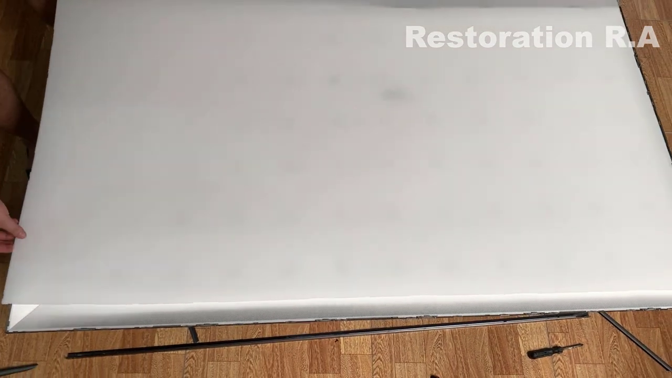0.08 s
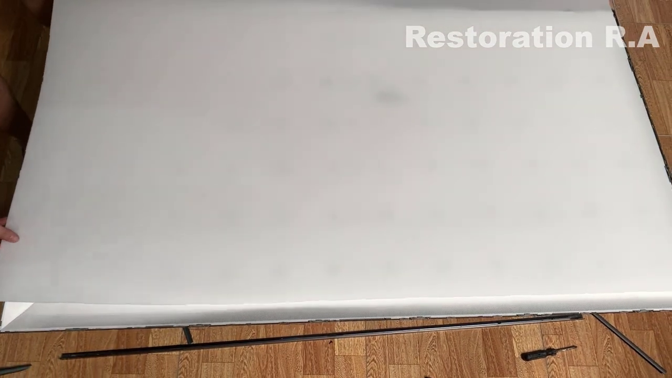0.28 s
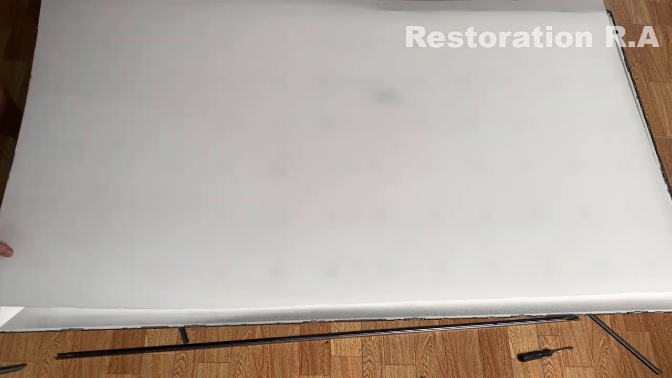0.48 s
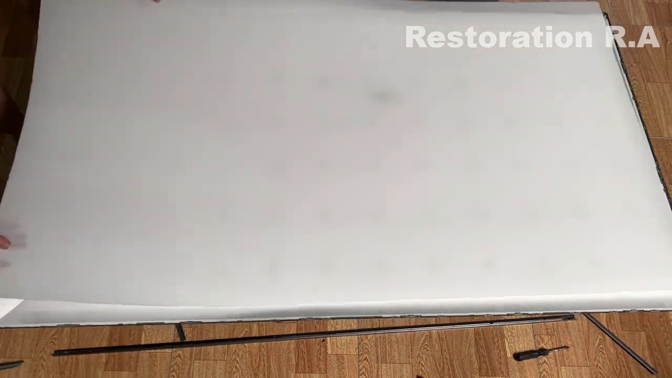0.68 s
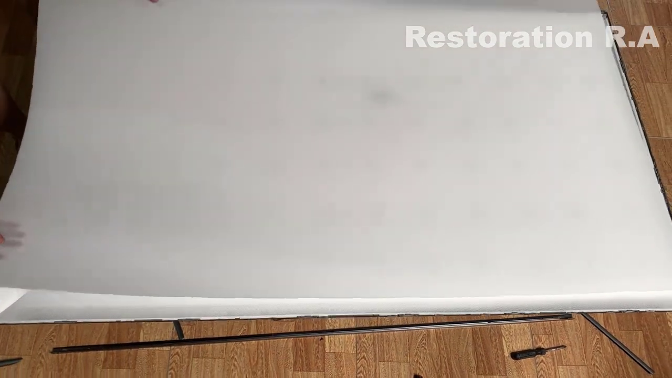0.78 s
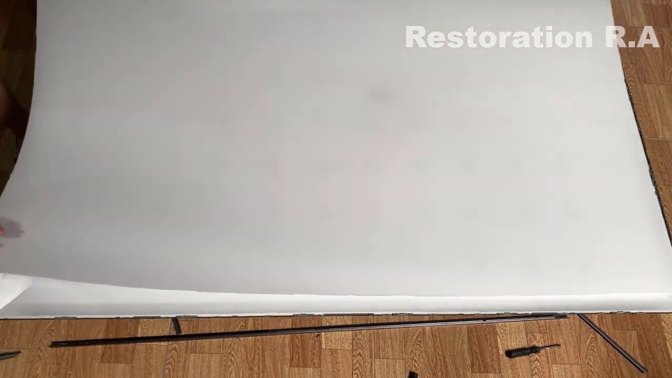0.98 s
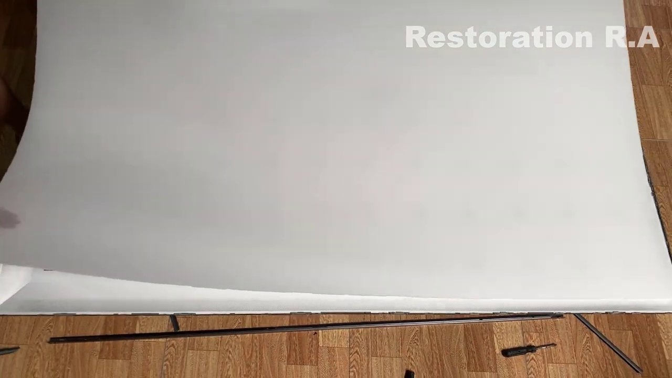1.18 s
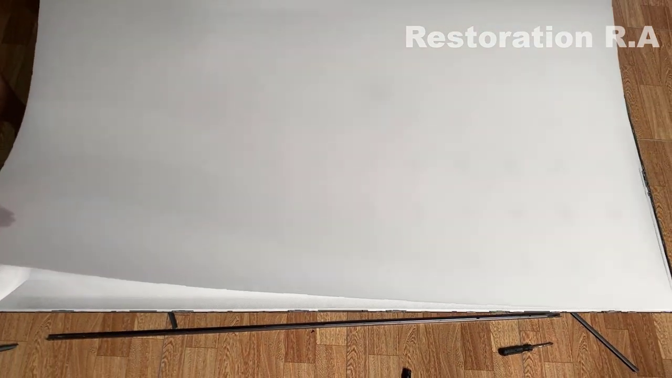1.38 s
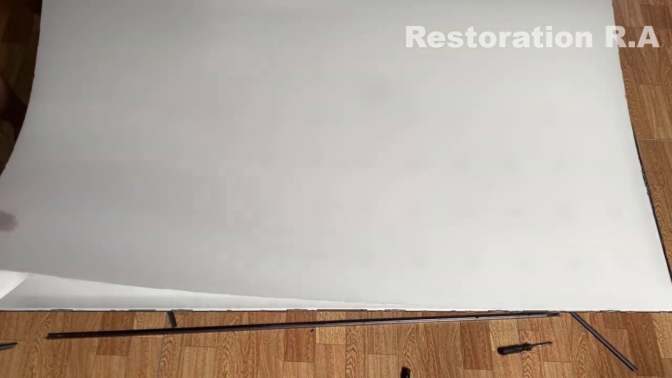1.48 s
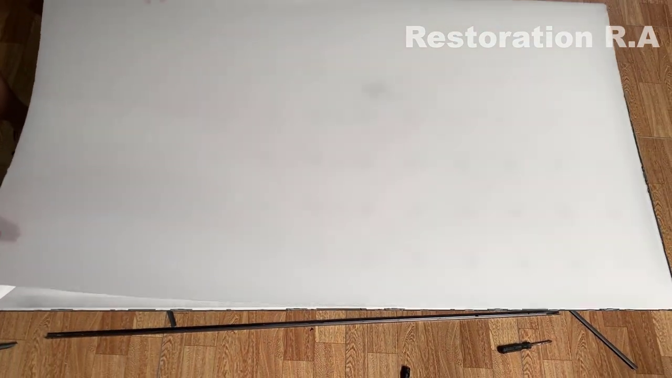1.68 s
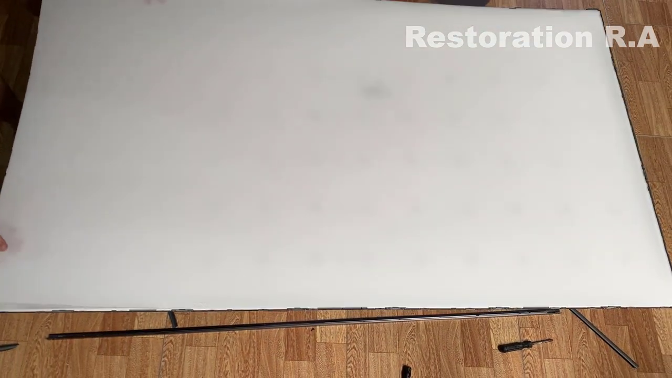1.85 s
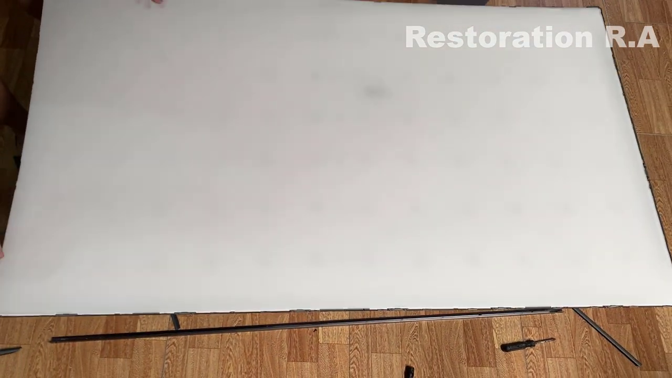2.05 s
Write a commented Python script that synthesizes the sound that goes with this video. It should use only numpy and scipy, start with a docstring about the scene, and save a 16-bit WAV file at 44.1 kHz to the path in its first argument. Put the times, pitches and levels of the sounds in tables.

```python
"""Large plastic sheet, buckling and sliding

A large thin plastic sheet is lifted by one edge and let down again in a small workshop, in stereo.
Buckles are filtered impulses with a ringing pop; bending is random crackle, crinkles and dull wobbles.
Slides are dense stick-slip ticks shaped into rasp, scrape and hiss; groans are gliding rough tones.
Soft flaps are swells of low noise, with one low whump. Decaying noise makes the short room reverb.
A quiet noise floor lies beneath."""
import sys
import numpy as np
from scipy import signal
from scipy.fft import rfft, irfft
from scipy.io import wavfile
from scipy.ndimage import uniform_filter1d, map_coordinates

SR = 44100
rng = np.random.default_rng(int(sys.argv[2]) if len(sys.argv) > 2 else 0)


def transcribe(signal):
    """Save signal, clipped to [-1, 1], as a 16-bit WAV file at the path in sys.argv[1]."""
    frames = np.atleast_2d(signal).T
    limited = np.clip(frames, -1, 1)
    pcm = np.round(limited * 32767).astype(np.int16)
    wavfile.write(sys.argv[1], SR, pcm)


N = 92610
TIME = np.arange(N) / SR  # s

# All event levels are relative, ahead of the layer gains and the room mix.
# Rise and fall are 1/e times either side of the peak at t, except in slides,
# which start at t and ramp up over the rise. Colours only set a spectral shape.

# Sharp buckles: t/s, body level/dB, tick level/dB, crack level/dB, f of the snapping patch/Hz
BUCKLES = [(.201, -11, -3, -39, 1290), (.2335, -52, -7.5, -24, 1300), (0.2533, -6.5, -4.5, -16, 1410),
           (0.2579, -9, -7.5, -14, 1270), (.265, -3.5, -1.5, -26, 1330), (0.393, -9, -9, -44, 637),
           (.425, -14, -6, -28.5, 910), (.462, -17, -7, -15, 660), (.482, -8.5, 0, -26, 620),
           (0.512, -28, -9, -35, 503), (.598, -11, -8.5, -40, 1323), (0.6623, -8.5, -14, -42.5, 823),
           (.778, -18, -24, -47, 537), (.806, -4, -6.5, -25, 890), (.849, -20, -20, -31, 834),
           (.891, -13, 0, -38, 526), (1.047, -40, -19, -37, 900), (1.126, -26.5, -12, -6.5, 990),
           (1.177, -16, -5, -37, 700), (1.194, -6, -13, -34, 746), (1.224, -4.5, -11, -25.5, 750),
           (1.243, -5, -3, -29, 1226), (1.276, -11, -13.5, -25, 617), (1.338, -6.5, -12, -24.5, 613),
           (1.360, -5, -22, -16.5, 620), (1.373, -1, -15, -7, 747), (1.389, -2.5, -30, -25, 613),
           (1.438, -7, -20.5, -24, 787), (1.461, -6.5, -15, -21, 826), (1.8035, -8, -48, -53, 680),
           (1.848, -31, -49.5, -58, 774)]
BUCKLE_DB, TICK_DB, PATCH_DB = 9, -8.5, -6  # gain of all buckles; tick trim; patch against body
PATCH_T60_S, CONTACT_RATIO = 0.046, 2.14  # contact low-pass as a multiple of the patch pitch
# Colour of the hollow pop and the fine crackle: f/Hz, level/dB
BODY_COLOUR = [(60, -46.5), (200, -23), (350, -9), (480, -6), (620, -1), (820, 2.5), (1000, -9), (1250, 0),
               (1500, -6), (1800, -7), (2500, -18.5), (3100, -31), (3900, -14), (5500, -41.5), (16000, -16)]
# Colour of the ringing tick: f/Hz, level/dB
TICK_COLOUR = [(300, -15.5), (900, -13.5), (2500, -11), (3100, -14.5), (3900, 10), (4300, 10.5),
               (5000, -17), (8000, -32), (9700, -9.5), (10900, 12), (12300, -8), (14200, -12), (15300, 9),
               (17000, -11)]
# Colour of the dry crack: f/Hz, level/dB
CRACK_COLOUR = [(200, -18), (900, 14.5), (2000, 6), (2800, 11.5), (3500, -8), (4600, 0.5), (6000, -2.5),
                (8000, -7), (11000, 1.5), (15500, -5), (17000, -20)]
# Ringing modes of the sheet: f/Hz, level/dB (ahead of MODE_DB)
SHEET_MODES = [(446, 2), (520, -3), (563, -6), (626, 0.5), (691, -2.5), (796, -8.5), (978, 3.5),
               (1209, -14), (1321, -11.5), (1809, -14)]
MODE_T60_S, MODE_DB = 0.24, -49.5

# Bending effort, the level of crackle and crinkles: t/s, level/dB
BENDING_EFFORT = [(0, -67), (.19, -62.5), (.215, -27), (.245, -45), (.265, -21), (.30, -45), (.385, -39),
                  (.405, -26), (.48, -23), (.52, -39.5), (.59, -34.5), (.65, -37), (.68, -28), (.74, -32),
                  (.78, -47), (.82, -23), (.86, -38), (.91, -31.5), (.98, -64), (1.11, -48), (1.14, -36),
                  (1.21, -46.5), (1.24, -32.5), (1.31, -28.5), (1.385, -22.5), (1.45, -25.5), (1.51, -30),
                  (1.62, -32.5), (1.68, -38), (1.74, -57.5), (1.81, -44), (1.86, -55), (1.88, -86),
                  (2.1, -88)]
CRACKLES_PER_S, CRACKLE_SPREAD_DB, FINE_CRACKLE_DB = 700, 4, -2
BEND_PER_S, BEND_SHIFT_S = 9, 0.003
CRINKLES_PER_S, CRINKLE_SPREAD_DB, CRINKLE_DB = 110, 2.5, -6
CRINKLE_HZ, CRINKLE_SPREAD_OCTAVES, CRINKLE_T60_S, CRINKLE_LOWEST_HZ = 978, 0.519, 0.014, 373
# Slow flexes of the whole sheet: t/s, rise/s, fall/s, level/dB
WOBBLES = [(1.862, 0.034, 0.034, -38), (1.908, 0.0088, 0.0067, -47.5), (2.066, 0.02, 0.012, -35.5)]
# Colour of the wobbles: f/Hz, level/dB
WOBBLE_COLOUR = [(100, -24), (350, -6), (480, 1), (600, 4.5), (900, -2.5), (1400, -25.5), (2200, -38),
                 (5000, -78)]

# Groans of the flexing sheet: t/s, rise/s, fall/s, f at the peak/Hz, glide/(octaves per s), level/dB
GROANS = [(.428, 0.0086, 0.012, 904, -7.5, -29), (.475, 0.018, 0.022, 660, 0, -29),
          (.50, 0.0096, .014, 530, -1, -28), (.543, 0.026, 0.025, 529.4, -1, -31),
          (.672, .005, 0.023, 305, 1.5, -40), (.735, .025, .025, 275, 1.5, -51),
          (.825, 0.007, 0.013, 581, 0, -26.5), (.905, 0.0068, 0.037, 545, -2.25, -34),
          (.968, 0.0047, 0.0075, 519, -3, -41.5), (1.07, .008, .008, 755, 3.5, -38.5),
          (1.245, 0.011, 0.0085, 318.8, -1.5, -32.5), (1.385, 0.01, 0.015, 357, -3, -29),
          (1.555, .012, 0.019, 370, 0, -33.5)]
GROAN_ROUGH, GROAN_ROUGH_PER_S = 0.45, 110

# Slides of sheet on sheet: start t/s, rise/s, length from t/s, squeaky rasp level/dB,
# coarse scrape level/dB, hiss level/dB, lower edge f of the hiss/Hz
SLIDES = [(0.137, 0.084, 0.105, -60, -53, -51.5, 6900), (0.236, 0.004, 0.012, -35.5, -35, -33, 9000),
          (0.25, 0.011, 0.028, -30, -38, -43, 8100), (0.389, 0.002, 0.071, -32, -39.5, -28.5, 4200),
          (0.469, 0.0043, 0.049, -34.5, -38.5, -36, 9900), (0.615, .003, 0.014, -31, -34, -27, 9100),
          (0.66, 0.0064, 0.023, -37.5, -36, -37, 9750), (0.785, .004, 0.018, -36, -41, -27.5, 9500),
          (0.801, .002, 0.08, -32.5, -35.5, -34.5, 9400), (0.888, .004, 0.024, -39, -29.5, -26, 9300),
          (1.042, 0.00064, 0.032, -41, -70, -42, 10200), (1.147, 0.0071, 0.092, -54, -34, -40.5, 9500),
          (1.218, 0.095, 0.13, -27, -31, -23.5, 8760), (1.356, 0.0031, 0.16, -33.5, -31.5, -30, 8150),
          (1.507, 0.054, 0.13, -51, -30.5, -25.5, 10400), (1.647, 0.0059, 0.042, -37, -50, -33, 10800),
          (1.799, 0.001, 0.0066, -49, -72, -24.5, 13800), (1.899, 0.0034, 0.011, -68, -77, -50.5, 9500)]
SLIPS_PER_S, SLIP_SPREAD_DB, SLIDE_RELEASE_S = 6000, 2.5, 0.0041
CATCHES_PER_S, CATCH_SPREAD_DB = 3200, 5
START_PUSH_DB, START_PUSH_S = 0.5, 0.0071
JUDDER_PER_S, JUDDER_DB = 130, 2.8
SQUEAK_PER_S, SQUEAK_DB = 60, 1
FLEX_PER_S, FLEX_SHIFT_S, HISS_SHIFT_S = 30, 0.000669, 0.001
# Edges of the sheet dragging grittily: t/s, rise/s, fall/s, level/dB
DRAGS = [(.43, 0.028, 0.014, -33.5), (.89, .004, 0.0073, -49), (1.226, .002, 0.014, -31),
         (1.345, 0.095, 0.028, -36.5), (1.485, 0.014, 0.015, -33), (1.59, 0.061, .03, -37.5)]
# Colour of the squeaky rasp: f/Hz, level/dB
RASP_COLOUR = [(300, -85), (2400, -26.5), (3100, -25.5), (3400, -14), (3600, 6.5), (3790, 6), (3970, -1),
               (4200, -13.5), (4700, -22.5), (5700, -38), (6700, -44), (16000, -45)]
# Colour of the coarse scrape: f/Hz, level/dB
SCRAPE_COLOUR = [(80, -44), (300, -15), (1200, -1.5), (2400, 2), (3050, -5.5), (3600, 5.5), (4400, 0),
                 (5300, -12), (6700, -45), (9000, -27.5), (16000, -29)]
# Colour of the gritty drags: f/Hz, level/dB
GRIT_COLOUR = [(300, -52), (3000, -33.5), (4400, 11.5), (5000, 3.5), (5700, 1), (6800, -21.5), (8500, -2),
               (10000, -10), (13000, -38)]
# Colour of the hiss: f/Hz, level/dB
HISS_COLOUR = [(1000, -21), (4500, -8), (5700, -5), (6700, -6), (8600, -13), (9800, -0.5), (10500, 6.5),
               (11000, 4.5), (11800, -8.5), (13400, -2), (14400, -6.5), (15400, -1), (16500, -24.5)]

# Soft flaps: t/s, rise/s, fall/s, air push level/dB, drumming level/dB
FLAPS = [(.26, 0.0074, 0.055, -48.5, -66), (.48, 0.031, 0.058, -59, -42.5),
         (0.666, 0.0073, 0.038, -46, -28.5), (.73, 0.046, 0.05, -48.5, -34.5),
         (1.235, 0.022, 0.017, -66, -42), (1.386, 0.0077, 0.0099, -38.5, -28.5),
         (1.44, 0.018, 0.064, -62, -43), (1.54, 0.063, 0.03, -65.5, -44.5)]
# Colour of the pushed air: f/Hz, level/dB
PUSH_COLOUR = [(20, -34), (45, -9), (68, -1.5), (100, -6.5), (160, -21), (500, -61)]
# Colour of the drumming sheet: f/Hz, level/dB
DRUM_COLOUR = [(50, -43), (110, -5), (170, 2.5), (230, -1.5), (300, 2), (380, 3), (600, 4.5), (2000, -71.5)]
# The sagging sheet drops on its cushion of air: t/s, rise/s, fall/s, f/Hz, level/dB
WHUMP = (1.385, .024, .024, 69, -34)

# Place of the pops, bending, groans and flaps: delay to the left microphone/s,
# early reflection level/dB, room level/dB (both against the direct sound)
BODY_PLACE = (.00002, -0.59, 0)
# Place of the rasp, scrape and drags: same columns
RASP_PLACE = (0.00017, 0.82, 0.54)
# Place of the hiss: same columns
HISS_PLACE = (0.0002414, -18, -0.62)
# Reverb time of the room: f/Hz, T60/s
ROOM_T60 = [(100, 0.72), (600, 0.36), (1500, 0.27), (4000, 0.23), (11000, 0.255), (16000, 0.24)]
EARLY_T60_S, ROOM_GAP_S = 0.035, 0.0056
LIKENESS_HZ, BASS_LIKENESS = 890, 0.92  # left-right correlation: corner, and value in the deep bass
# Colour of the background: f/Hz, level/dB
FLOOR_COLOUR = [(20, -23.5), (65, -1), (130, -2.5), (300, -8.5), (600, 0), (1200, -23), (3000, -23),
                (8000, -29), (16000, -43.5)]
FLOOR_DB, LEFT_DB, TOP_HZ = -58.5, -0.95, 15550


def buckles():
    """A patch of the sheet snaps through: a hollow pop at its own pitch, a ringing tick and a dry crack."""
    body, patch, tick, crack = np.zeros((4, N))
    t = TIME[:SR // 10]
    for at, body_db, tick_db, crack_db, hz in BUCKLES:
        i = int(at * SR)
        span = slice(i, i + len(t))
        contact = signal.butter(3, min(CONTACT_RATIO * hz, .4 * SR), fs=SR, output="sos")
        tone = np.cos(2 * np.pi * hz * t) * decay(t, PATCH_T60_S)
        tone = tone / np.linalg.norm(tone)
        body[span] += undb(body_db) * signal.sosfilt(contact, signal.unit_impulse(len(t)))
        patch[span] += undb(body_db + PATCH_DB) * signal.sosfilt(contact, tone)
        tick[i] += undb(tick_db + TICK_DB)
        crack[i] += undb(crack_db)
    pop = colour(ring(body), BODY_COLOUR) + patch
    return undb(BUCKLE_DB) * (pop + colour(tick, TICK_COLOUR) + colour(crack, CRACK_COLOUR))


def ring(x):
    """The modes of the sheet ring on faintly after every click."""
    t = TIME[:SR // 2]
    modes = sum(undb(db + MODE_DB) * np.cos(2 * np.pi * hz * t) for hz, db in SHEET_MODES)
    return x + signal.fftconvolve(x, modes * decay(t, MODE_T60_S))[:N]


def bending():
    """Fine crackle and coarser crinkles follow the bending effort; slow flexes wobble dully."""
    effort = undb(np.interp(TIME, *np.array(BENDING_EFFORT).T))
    crackle = colour(ring(effort * clicks(CRACKLES_PER_S, CRACKLE_SPREAD_DB)), BODY_COLOUR)
    crackle = flexing(crackle, BEND_PER_S, BEND_SHIFT_S)
    flex = sum(undb(db) * swell(at, rise, fall) for at, rise, fall, db in WOBBLES)
    wobble = colour(flex * rng.standard_normal(N), WOBBLE_COLOUR)
    return undb(FINE_CRACKLE_DB) * crackle + undb(CRINKLE_DB) * effort * crinkles() + wobble


def crinkles():
    """Small patches snap at uneven moments, each ringing briefly at its own pitch."""
    snaps = clicks(CRINKLES_PER_S, CRINKLE_SPREAD_DB)
    octaves = np.clip(rng.standard_normal(N), -1.5, 2) * CRINKLE_SPREAD_OCTAVES
    t = TIME[:SR // 20]
    out = np.zeros(N + len(t))
    for i in np.flatnonzero(snaps):
        tone = np.sin(2 * np.pi * CRINKLE_HZ * 2 ** octaves[i] * t) * decay(t, CRINKLE_T60_S)
        out[i:i + len(t)] += snaps[i] * tone / np.linalg.norm(tone)
    low_cut = signal.butter(2, CRINKLE_LOWEST_HZ, "high", fs=SR, output="sos")
    return signal.sosfilt(low_cut, out[:N])


def groans():
    """One resonance of the sheet swells and glides, a little roughly, as the tension changes."""
    out = 0
    for at, rise, fall, hz, glide, db in GROANS:
        pitch = hz * 2 ** np.clip(glide * (TIME - at), -1, 1)
        # a complex drift roughens both loudness and phase
        drift = wander(GROAN_ROUGH_PER_S) + 1j * wander(GROAN_ROUGH_PER_S)
        tone = np.exp(2j * np.pi * np.cumsum(pitch) / SR)
        out = out + undb(db) * swell(at, rise, fall) * np.real((1 + GROAN_ROUGH * drift) * tone)
    return out


def slides():
    """Stick-slip ticks, with a slight extra push at each start: rasp with scrape and drags, and the hiss."""
    slips = clicks(SLIPS_PER_S, SLIP_SPREAD_DB) * undb(JUDDER_DB * wander(JUDDER_PER_S))
    rasp, scrape, hiss = np.zeros((3, N))
    for at, rise, length, rasp_db, scrape_db, hiss_db, edge_hz in SLIDES:
        since = np.maximum(TIME - at, 0)
        release = np.exp(-np.maximum(since - length, 0) / SLIDE_RELEASE_S)
        start_push = undb(START_PUSH_DB * np.exp(-since / START_PUSH_S))
        stroke = np.sqrt(np.minimum(since / rise, 1)) * release * start_push
        rasp += undb(rasp_db) * stroke
        scrape += undb(scrape_db) * stroke
        # a lighter touch hisses higher
        touch = signal.butter(3, min(edge_hz, .4 * SR), "high", fs=SR, output="sos")
        hiss += undb(hiss_db) * signal.sosfilt(touch, slips * (stroke + 1e-9))
    drag = sum(undb(db) * swell(at, rise, fall) for at, rise, fall, db in DRAGS)
    catches = clicks(CATCHES_PER_S, CATCH_SPREAD_DB)
    squeak = colour(slips * rasp * undb(SQUEAK_DB * wander(SQUEAK_PER_S)), RASP_COLOUR)
    squeak = flexing(squeak, FLEX_PER_S, FLEX_SHIFT_S)
    friction = squeak + colour(catches * scrape, SCRAPE_COLOUR) + colour(slips * drag, GRIT_COLOUR)
    return friction, flexing(colour(hiss, HISS_COLOUR), BEND_PER_S, HISS_SHIFT_S)


def flaps():
    """The sagging sheet pushes air and drums softly; once it drops with a low whump."""
    push = sum(undb(db) * swell(at, rise, fall) for at, rise, fall, db, _ in FLAPS)
    drum = sum(undb(db) * swell(at, rise, fall) for at, rise, fall, _, db in FLAPS)
    air = colour(push * rng.standard_normal(N), PUSH_COLOUR)
    drumming = colour(drum * rng.standard_normal(N), DRUM_COLOUR)
    at, rise, fall, hz, db = WHUMP
    whump = undb(db) * swell(at, rise, fall) * np.sin(2 * np.pi * hz * (TIME - at))
    return air + drumming + whump


def placed(x, room, lag_s, early_db, room_db):
    """A source reaches both microphones, directly and by way of the room."""
    early, tail = room
    hz = np.fft.rfftfreq(N, 1 / SR)
    left = irfft(rfft(x) * np.exp(-2j * np.pi * hz * lag_s), N)
    reverb = undb(early_db) * early + undb(room_db) * tail
    echoes = signal.fftconvolve(x[None], reverb)[:, :N]
    # share the energy out, so the room adds no loudness of its own
    return (np.array([left, x]) + echoes) / np.sqrt(1 + undb(room_db) ** 2 + undb(early_db) ** 2)


def workshop():
    """Quick reflections off floor and sheet, and a room tail that decays at its own rate in each band."""
    hz = np.fft.rfftfreq(N, 1 / SR)
    edges = np.r_[0, np.geomspace(200, SR / 2, 10)]
    walls, tail = rfft(diffuse()), 0
    for lo, hi in zip(edges, edges[1:]):
        fade = decay(TIME, over_hz(ROOM_T60, (lo + hi) / 2)) * (TIME > ROOM_GAP_S)
        band = irfft(walls * ((hz >= lo) & (hz < hi)), N)
        tail = tail + band * fade / np.linalg.norm(fade)
    fade = decay(TIME, EARLY_T60_S) * (TIME > .0008)
    return diffuse() * fade / np.linalg.norm(fade), tail


def background():
    """A quiet, steady stereo noise floor."""
    return undb(FLOOR_DB) * np.array([colour(side, FLOOR_COLOUR) for side in diffuse()])


def diffuse():
    """Noise from all around: alike left and right in the bass, unrelated in the treble."""
    hz = np.fft.rfftfreq(N, 1 / SR)
    alike = BASS_LIKENESS / (1 + (hz / LIKENESS_HZ) ** 2)
    mid, side = rfft(rng.standard_normal((2, N)))
    shared = mid * np.sqrt((1 + alike) / 2)
    opposed = side * np.sqrt(np.abs(1 - alike) / 2)
    return irfft(shared + np.array([[1], [-1]]) * opposed, N)


def clicks(per_s, spread_db):
    """Random clicks of uneven size, levelled to a roughly steady mean power of one."""
    hits = rng.random(N) < per_s / SR
    x = hits * rng.choice([-1, 1], N) * undb(spread_db * rng.exponential(size=N))
    return x / np.sqrt(np.abs(uniform_filter1d(x * x, size=1500)) + 1e-4)


def flexing(x, per_s, shift_s):
    """Resonances drift slightly in pitch, by a wandering time shift, as the sheet's curve changes."""
    return map_coordinates(x, [(TIME + shift_s * wander(per_s)) * SR], order=3, mode="nearest")


def wander(per_s):
    """A smooth random drift with a spread near one, through per_s random points each second."""
    return map_coordinates(rng.standard_normal(N // 50), [TIME * per_s], order=3, mode="mirror")


def swell(at, rise, fall):
    """Exponential rise to a moment and fall after it."""
    return np.exp(-np.maximum((at - TIME) / rise, (TIME - at) / fall))


def decay(t, t60):
    """A fall of 60 dB in t60 seconds."""
    return undb(-60 * t / t60)


def colour(x, points, size=4096):
    """Causal minimum-phase filter of unit energy with the given spectral shape."""
    cep = irfft(np.log(undb(over_hz(points, np.fft.rfftfreq(size, 1 / SR)))))
    # folding the cepstrum forward packs the response towards its start
    cep[1:size // 2] *= 2
    cep[size // 2 + 1:] = 0
    h = irfft(np.exp(rfft(cep)))
    return signal.fftconvolve(x, h / np.linalg.norm(h))[:N]


def over_hz(points, hz):
    """Read a table on a log-frequency axis."""
    f, v = np.array(points, float).T
    return np.interp(np.log(hz + 1), np.log(f), v)


def undb(db):
    """Decibels to gain."""
    return 10 ** (np.asarray(db) / 20)


def scene():
    """The handled sheet in the room, over a quiet background, the left side slightly lower."""
    room = workshop()
    friction, hiss = slides()
    sheet = placed(buckles() + bending() + groans() + flaps(), room, *BODY_PLACE)
    sheet = sheet + placed(friction, room, *RASP_PLACE) + placed(hiss, room, *HISS_PLACE)
    return (sheet + background()) * undb([[LEFT_DB], [0]])


def record(dry):
    """The recorder cuts the top with a steep elliptic low-pass."""
    return signal.sosfilt(signal.ellip(8, .2, 70, TOP_HZ, fs=SR, output="sos"), dry)


dry = scene()
out = record(dry)
transcribe(out)
```